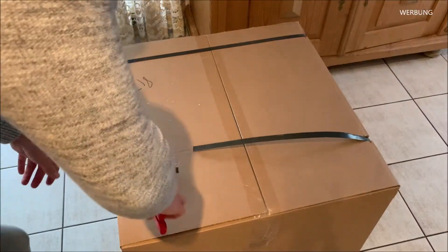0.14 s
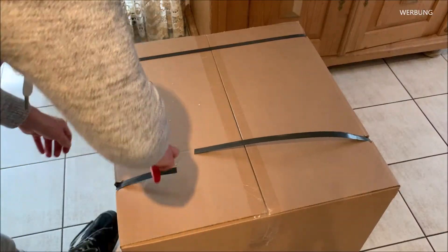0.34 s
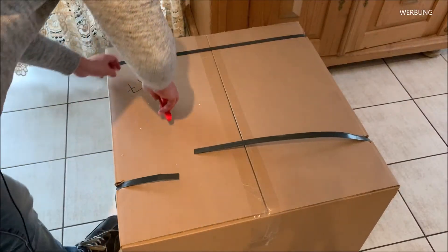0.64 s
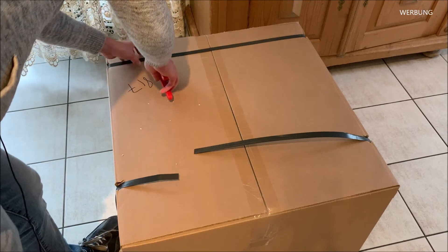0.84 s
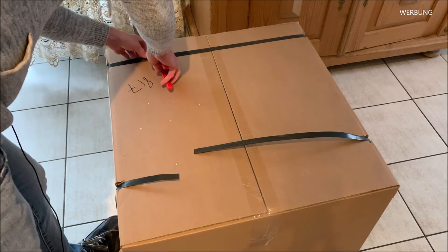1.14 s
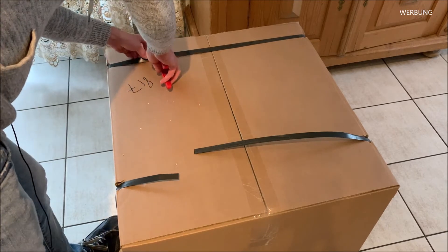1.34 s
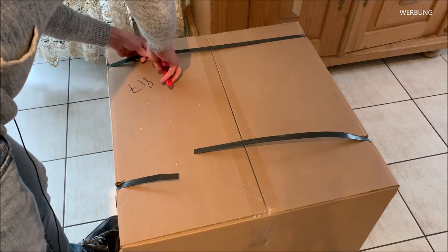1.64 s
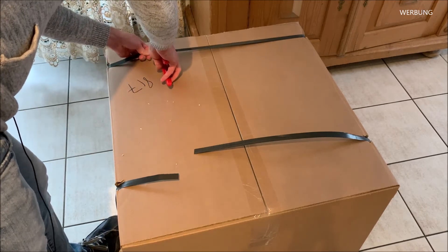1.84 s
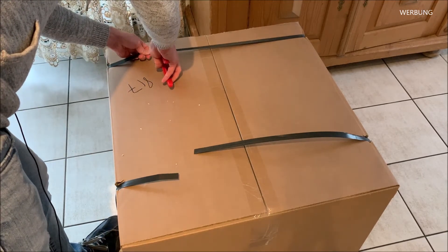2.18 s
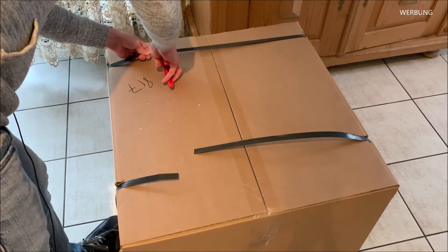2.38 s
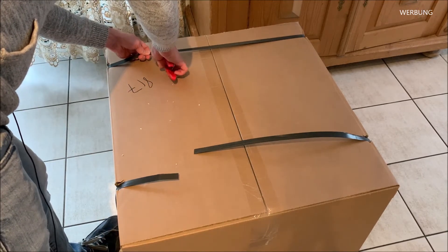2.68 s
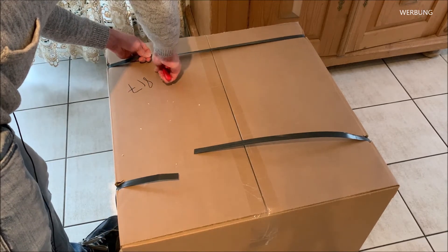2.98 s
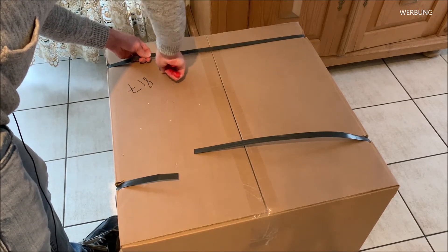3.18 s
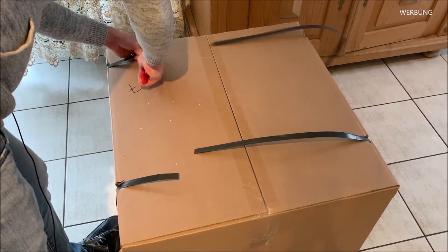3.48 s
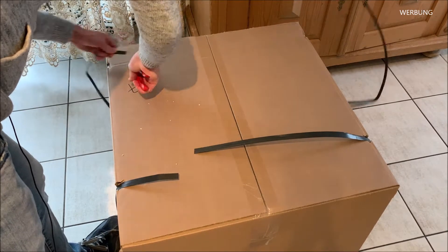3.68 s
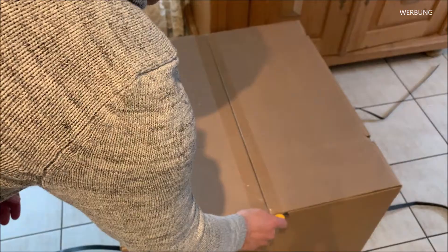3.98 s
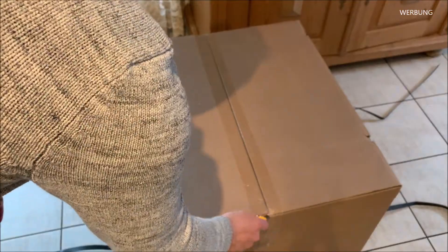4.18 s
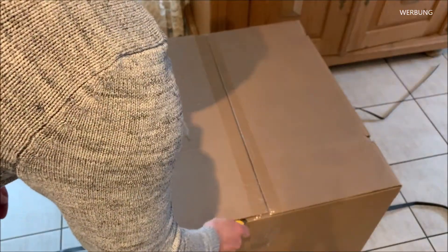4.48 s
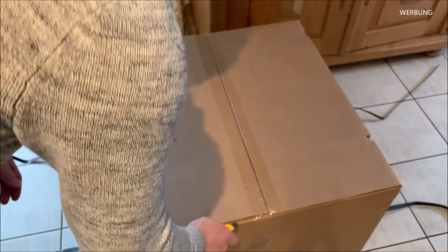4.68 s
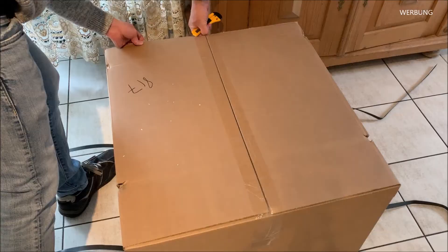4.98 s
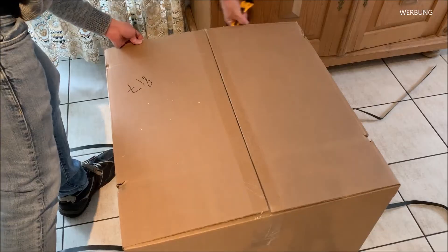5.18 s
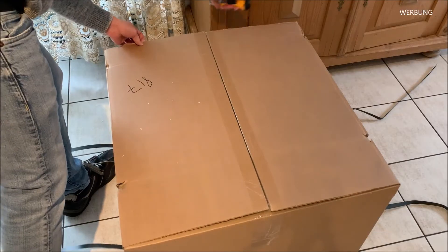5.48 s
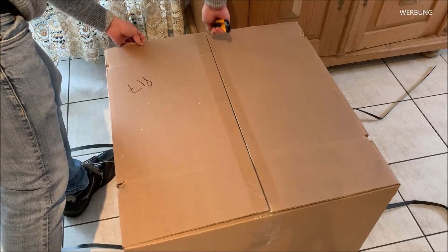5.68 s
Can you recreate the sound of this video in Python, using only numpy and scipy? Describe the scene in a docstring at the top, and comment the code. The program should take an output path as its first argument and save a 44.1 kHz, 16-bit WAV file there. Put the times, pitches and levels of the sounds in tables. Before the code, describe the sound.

Close up in a tiled room, hands bump and rustle over a large hollow cardboard box, with low air buffeting the microphone. The strap ticks and creaks faintly, then snaps with a very loud crack and boxy thump, and its loose end slaps down and rings briefly. After an abrupt cut, a knife slits tape in raspy pulls that drum the lid.

```python
"""In a tiled room, stirred air buffets the microphone while hands fumble on a big cardboard box.
Snips bite through its taut plastic strap: crunching noise bursts, with knocks of the box's ringing modes.
The strap ticks and creaks in stick-slip jerks, snaps at 3.5 s, and its loose end whips down and rings.
After a jump in time a knife squeaks and slits the tape along the lid in two strokes of several pulls;
torn tape is coloured random clicks, and coarser clicks drum the hollow box under it."""
import sys
import numpy as np
from scipy import signal
from scipy.io import wavfile
from scipy.ndimage import uniform_filter1d

SR = 44100
rng = np.random.default_rng(int(sys.argv[2]) if len(sys.argv) > 2 else 0)


def to_wav(s):
    """Save 16-bit WAV."""
    ch = np.atleast_2d(s).T  # columns
    pcm = np.round(np.clip(ch, -1, 1) * 32767)  # PCM
    wavfile.write(sys.argv[1], SR, pcm.astype(np.int16))


N = 257103
TIME = np.arange(N) / SR
JUMP_S = 3.97  # jump in time from strap to knife
# In all tables, levels are those before the trims in the functions; spectra are relative.


def amp(db):
    """Linear gain of a level in dB."""
    return 10 ** (np.asarray(db) / 20)


def evened(x):
    """Scales a steady sound to an RMS of 1."""
    return x / np.sqrt(np.mean(x ** 2) + 1e-20)


def unit(x):
    """Scales a short sound to the energy of 25 ms at full level."""
    return x * np.sqrt(SR / 40 / (np.sum(x ** 2) + 1e-20))


def read(points, hz):
    """Reads a curve of (f, value) points along a logarithmic frequency axis."""
    f, value = np.transpose(points)
    return np.interp(np.log(hz + 1), np.log(f + 1), value)


def level(rows):
    """Rows of (t, dB) as a gain curve, silent outside them."""
    t, db = np.transpose(rows)
    return amp(np.interp(TIME, t, db)) * (TIME >= t[0]) * (TIME <= t[-1])


def add(mix, start_s, sound):
    """Lays a sound into the mix in place, cut off at the end."""
    part = mix[max(round(start_s * SR), 0):][:len(sound)]
    part += sound[:len(part)]


def through(x, response):
    """Passes a sound through an impulse response, keeping its length."""
    return signal.oaconvolve(x, response)[:len(x)]


def colour(points, size=4096):
    """Causal (minimum-phase) impulse response with the given spectrum."""
    hz = abs(np.fft.fftfreq(size, 1 / SR))
    log_gain = np.log(amp(read(points, hz)))
    spectrum = np.exp(np.conj(signal.hilbert(log_gain)))
    return np.fft.ifft(spectrum).real[:size // 2]


def ring(hz, t60, size=22050):
    """A resonance: a sine that falls by 60 dB in t60 seconds."""
    t = TIME[:size]
    return np.sin(2 * np.pi * hz * t) * np.exp(-np.log(1000) * t / t60)


def slips(per_s, spread_db, hiss):
    """Stick and slip: random clicks of uneven size over a smooth hiss."""
    uneven_db = spread_db * np.minimum(rng.exponential(1, N), 4)
    sizes = amp(uneven_db) * rng.choice([-1, 1], N)
    clicks = evened(sizes * (rng.random(N) < per_s / SR))
    return evened(clicks + hiss * rng.standard_normal(N))


def waver(depth_db, per_s):
    """A gain wandering around 1, drawn anew per_s times a second."""
    return amp(depth_db * np.interp(TIME * per_s, np.arange(N), rng.standard_normal(N)))


def arches(rows, roundness, axis=2):
    """Each move speeds up and slows down again; its peak dB is in the given column."""
    out = np.zeros(N)
    for row in rows:
        progress = np.arange(0, row[1], 1 / SR) / row[1]
        add(out, row[0], amp(row[axis]) * abs(np.sin(np.pi * progress)) ** roundness)
    return out


# quiet noise of the room: f/Hz, density/dB per Hz
ROOM_FLOOR = [(20, -2), (50, 12.5), (90, -6.5), (300, -10.5), (700, -19), (2000, -25), (6000, -33.5),
              (16000, -33.5)]
# air on the microphone: f/Hz, density/dB per Hz
GUST = [(8, -4), (18, 6.5), (30, 0), (50, -7.5), (80, -25.5), (140, -35.5), (400, -81)]
# sweeps of the arm that buffet the microphone: start t/s, length t/s, level/dB
ARM_SWEEPS = [(0, 0.82, -31.5), (.46, 0.52, -23.5), (.9, 0.62, -35), (2.95, 0.98, -38), (5.08, 1, -52)]
DRAUGHT_DB, LATE_DRAUGHT_DB = -46, -48  # stirred air before and after the jump in time


def air(floor_db=-63, gust_db=-2, heave_db=22, late_heave_db=8):
    """Quiet room noise; stirred air and arm sweeps add low flutter and a pressure heave below hearing."""
    floor = evened(through(rng.standard_normal(N), colour(ROOM_FLOOR)))
    flutter = evened(through(rng.standard_normal(N), colour(GUST, size=16384)))
    heave_hz = 5 * waver(depth_db=2, per_s=7)
    heave = np.sin(2 * np.pi * np.cumsum(heave_hz) / SR)
    early = TIME < JUMP_S
    stirred = amp(np.where(early, DRAUGHT_DB, LATE_DRAUGHT_DB))
    draught = uniform_filter1d(np.hypot(arches(ARM_SWEEPS, roundness=0.37), stirred), size=1500)
    height = np.minimum(amp(np.where(early, heave_db, late_heave_db)) * draught, .7)
    height = uniform_filter1d(height, size=4000)
    return amp(floor_db) * floor + amp(gust_db) * draught * flutter + height * heave


# fingers bumping the box: f/Hz, density/dB per Hz
BUMP = [(50, -8), (130, -0.5), (200, -3.5), (300, -1.5), (430, -6), (600, -11), (800, -27.5), (1050, -16),
        (1500, -38), (3000, -40)]
# rustle of rubbed board: f/Hz, density/dB per Hz
RUB = [(300, -4.5), (700, 5), (1050, 5.5), (1400, 1.5), (2100, 3), (3200, -1.5), (4300, 0), (5800, -5),
       (7500, -3), (10000, -17), (16000, -24)]
# strap sliding over board: f/Hz, density/dB per Hz
SLIDE = [(1000, -27.5), (2500, -14), (4400, 1.5), (5600, -1), (7500, 7), (9200, 1), (11500, -8.5),
         (16000, -27)]
# a hand shifts its grip on the lid: start t/s, length t/s, box rumble level/dB, rustle level/dB
GRIP_SHIFTS = [(0, 0.021, -27, -34), (.05, 0.14, -51, -48.5), (.21, 0.047, -40, -41),
               (.5, 0.29, -53.5, -56.5), (.875, 0.16, -35.5, -43.5), (1.135, 0.069, -41, -56),
               (1.28, 0.18, -45, -54), (1.52, 0.24, -43.5, -52.5), (1.862, 0.035, -44, -81),
               (1.96, 0.054, -47, -62), (2.335, 0.037, -39.5, -46), (2.38, 0.13, -53.5, -69),
               (2.49, 0.17, -46.5, -57), (2.78, 0.079, -41, -53.5), (3.235, 0.029, -42.5, -55.5),
               (3.29, 0.062, -51, -60), (3.41, 0.1, -43, -55.5), (3.77, .07, -35.5, -56.5)]
# the smooth strap slides over the board: start t/s, length t/s, hiss level/dB
STRAP_SLIDES = [(.06, 0.065, -49), (.163, 0.067, -42.5), (.94, 0.051, -51), (1.06, 0.073, -51.5),
                (1.28, 0.046, -52.5), (1.37, .08, -51), (1.56, 0.15, -55), (2.52, 0.068, -61),
                (3.53, 0.24, -51.5), (3.755, 0.077, -36.5), (3.922, 0.053, -42)]
HELD_RUMBLE_DB, HELD_RUSTLE_DB = -57.5, -70  # hands never quite still while they hold the snips


def handling(rumble_db=-3, rustle_db=-2, slide_db=-1):
    """Fingers and strap drag over the board: sparse bumps in the box, a fine rustle and a smooth hiss."""
    grip = waver(depth_db=3, per_s=45)
    bumps = slips(per_s=60, spread_db=1.0, hiss=0.63)
    rumble = evened(through(bumps * grip, colour(BUMP)))
    fibres = slips(per_s=450, spread_db=4, hiss=.9)
    rustle = evened(through(fibres * grip, colour(RUB)))
    smooth_slips = slips(per_s=2700, spread_db=-2.5, hiss=1.0)
    slide = evened(through(smooth_slips, colour(SLIDE)))
    holding = TIME < JUMP_S
    press = np.hypot(arches(GRIP_SHIFTS, roundness=0.45), amp(HELD_RUMBLE_DB) * holding)
    drag = np.hypot(arches(GRIP_SHIFTS, roundness=0.65, axis=3), amp(HELD_RUSTLE_DB) * holding)
    sliding = arches(STRAP_SLIDES, roundness=1.7)
    return amp(rumble_db) * press * rumble + amp(rustle_db) * drag * rustle + amp(slide_db) * sliding * slide


# decay of the tiled room: f/Hz, t60/s
ROOM_T60 = [(100, 0.45), (400, 0.38), (1500, 0.51), (4000, 0.4), (8000, 0.3), (16000, 0.45)]


def room(x, build_s=0.0051):
    """Diffuse tail of the tiled room: noise that builds up, each band dying at its own speed."""
    hz, t, z = signal.stft(rng.standard_normal(SR), SR, nperseg=256)
    decay = np.exp(-np.log(1000) * t / read(ROOM_T60, hz)[:, None])
    tail = signal.istft(z * decay, SR, nperseg=256)[1][:SR]
    tail = tail * (1 - np.exp(-(TIME[:SR] / build_s) ** 2))
    return through(x, tail / np.linalg.norm(tail))


# reflections from lid, body and floor: delay t/s, linear gain
NEAR_ECHOES = [(.0036, 0.097), (.0049, 0.05), (.0063, .14), (0.011, 0.071)]


def near_echoes(x):
    """First reflections from the surfaces around the hands."""
    out = x.copy()
    for delay_s, gain in NEAR_ECHOES:
        add(out, delay_s, gain * x)
    return out


# modes of the hollow box, damped further while the panel is struck: f/Hz, level/dB, t60/s
BOX_MODES = [(121.5, 7, 0.71), (179, 4, 0.47), (219.6, 7.5, 0.71), (249, 9.5, 0.9), (299, 11.5, 0.057),
             (357, 5, 0.2), (438, -3.5, 0.74), (513, -9.5, 0.34), (550, -23.5, 1), (690, -14, 0.36),
             (816, -23, 0.069), (925, -6.5, 0.24), (986, -19.5, 0.22), (1390, -22, .45), (1670, -29.5, .25),
             (1810, -24, 0.6), (2400, -13.5, 0.27), (3400, -39.5, 0.37)]


def box_knock(damp_s=0.0083, ring_db=-24, give_s=0.00015, crush_db=-7, crush_s=.007):
    """The panel gives, heavily damped, with a dull crush of its flutes; the hollow box rings on weakly."""
    t = TIME[:SR // 2]
    modes = sum((-1) ** k * amp(db) * ring(hz, t60) for k, (hz, db, t60) in enumerate(BOX_MODES))
    damping = np.exp(-t / damp_s) + amp(ring_db)
    panel = unit(modes * damping * (1 - np.exp(-t / give_s)))
    crush = unit(through(rng.standard_normal(len(t)) * np.exp(-t / crush_s), colour(BUMP)))
    return unit(panel + amp(crush_db) * crush)


# clack of the board: f/Hz, density/dB per Hz
CLACK = [(150, -9.5), (450, 11.5), (800, 3.5), (1250, -4), (1600, -2.5), (2150, -5.5), (2700, -6.5),
         (4000, -18), (9000, -48)]
# crack of the plastic: f/Hz, density/dB per Hz
CRACK = [(800, -14.5), (2400, -11), (3400, 7), (4600, 7), (5500, 6.5), (6500, 2.5), (8100, 4.5),
         (10000, -2), (13000, -9), (16000, -19.5)]
# blows of strap, snips and knife on the box:
# t/s, box knock level/dB, board clack level/dB, plastic crack level/dB, crunch decay to 1/e t/ms
BLOWS = [(0.1661, -32, -40, -43, 3.5), (0.1774, -63, -33.5, -43, 3.1), (0.1931, -37.5, -28.5, -29, 2.4),
         (0.3866, -65, -54, -84, 6.6), (0.8151, -26, -50, -60.5, 1.7), (0.88, -32, -54, -52, 6.9),
         (0.8905, -32, -38.5, -48.5, 6.2), (0.9324, -69, -49, -45, 4), (0.936, -26, -40, -50.5, 11),
         (0.9802, -63, -40, -43, 4.3), (1, -49, -39.5, -47.5, 3), (1.072, -72, -39, -37.5, 2.2),
         (1.1428, -44, -50, -70, 3.7), (1.17, -42, -67, -81, 2), (1.589, -47, -73, -59, 2),
         (1.7202, -38.5, -82, -78, 1), (1.7544, -37.5, -44, -45.5, 6), (1.8659, -41.5, -65, -86, 3),
         (2.1068, -45.5, -88, -94, 1.6), (2.3421, -46.5, -48.5, -51, 11), (2.5925, -46, -45.5, -57, 1.6),
         (2.782, -32.5, -53, -77, 9), (2.8601, -35.5, -43, -46.5, 6.6), (3.2423, -41.5, -49, -59.5, 3),
         (3.2518, -38.5, -49, -58, 4), (3.418, -40.5, -53, -59, 0.83), (3.4976, -20.5, -27, -24.5, 3.2),
         (3.5003, -12, -15.5, -21, 0.72), (3.5027, -6, -10, -23.5, 2.3), (3.512, -18.5, -19.5, -30, 29),
         (3.53, -16.5, -22.5, -34.5, 60), (3.7265, -41.5, -52, -37, 2.6), (3.7291, -46, -36, -37.5, 9),
         (3.7502, -33, -36, -26, 3.9), (3.753, -29, -15, -24.5, 0.9), (3.756, -42.5, -28, -21, 1.7),
         (3.967, -57, -49.5, -64, 0.91), (4.0615, -80, -75, -66.5, 0.59), (4.1406, -41, -73, -53.5, 0.84),
         (4.2654, -30, -35.5, -33.5, 9), (4.5966, -59, -62, -59, 1.9), (4.8938, -58, -58.5, -59.5, 2),
         (5.1442, -23.5, -28.5, -52, 1.4), (5.436, -49, -59, -57, 2.8), (5.5669, -73, -60, -77, 3.7)]


def blows(knock_db=-2, clack_db=-1, crack_db=0,
          knock_room_db=-7, clack_room_db=-7, crack_room_db=-11, bite_db=-10, size=4096):
    """Each blow is a bite and a short crunch in board and plastic that also knocks the box.
    The room gathers sound from all sides, so it is fed the materials' smooth spectra."""
    direct, feed, t = np.zeros(N), np.zeros(N), TIME[:size]
    clack, crack = colour(CLACK), colour(CRACK)
    bite = unit(1.0 * (t == 0))  # a single-sample click
    for s, low_db, mid_db, high_db, ms in BLOWS:
        box = amp(low_db + knock_db) * box_knock()
        add(direct, s, box)
        add(feed, s, amp(knock_room_db) * box)
        board = clack, mid_db + clack_db, clack_room_db
        plastic = crack, high_db + crack_db, crack_room_db
        for material, db, send_db in (board, plastic):
            crunch = unit(rng.standard_normal(size) * np.exp(-t * 1000 / max(ms, .1)))
            contact = crunch + amp(bite_db) * bite
            add(direct, s, amp(db) * unit(through(contact, material)))
            add(feed, s, amp(db + send_db) * unit(material))
    return near_echoes(direct), feed


# brief dips of the level: start t/s, length t/s
DIPS = [(0.75, 0.033), (0.83, 0.052)]
DIP_DB = -39


def dips():
    """The level dips briefly, with soft edges."""
    inside = sum((TIME > s) & (TIME < s + length) for s, length in DIPS)
    return amp(DIP_DB * uniform_filter1d(inside.astype(float), size=256))


# a thin dry tick: f/Hz, density/dB per Hz
TICK_COLOUR = [(1200, -35), (2500, -7.5), (4800, -5.5), (6100, 6.5), (7500, 4), (9300, -3.5), (11300, 1),
               (13000, -6), (16000, 0.5)]
# ticks as the strap strains: t/s, level/dB
STRAIN_TICKS = [(1.9346, -67), (2.0728, -68.5), (2.252, -63), (2.6164, -62), (2.701, -69), (2.98, -59),
                (3.0355, -48), (3.051, -55), (3.07, -55.5), (3.0992, -52.5), (3.131, -53.5), (3.147, -54),
                (3.153, -53.5), (3.159, -57), (3.182, -61.5)]


def ticks(decay_s=0.00096, size=2048):
    """Straining plastic lets go in tiny dry clicks with almost no weight: short coloured noise bursts."""
    out, tick = np.zeros(N), colour(TICK_COLOUR)
    for s, db in STRAIN_TICKS:
        burst = rng.standard_normal(size) * np.exp(-TIME[:size] / decay_s)
        add(out, s, amp(db) * unit(through(burst, tick)))
    return out


# resonances of the snips and the taut strap: f/Hz, level/dB, t60/s
JAW_MODES = [(308, 11.5, 0.041), (1070, 3.5, 0.032), (1470, -11.5, .003), (2210, 2, 0.01),
             (4130, -5, 0.0066), (5400, -24, .005), (7550, 2.5, .007), (8220, -7, 0.024)]
# jaws creaking through the plastic: t/s, level/dB
CREAK_LEVEL = [(2.778, -66), (2.786, -42), (2.812, -47), (2.828, -38.5), (2.852, -42), (2.866, -27),
               (2.876, -40.5), (2.90, -77.5)]


def creak():
    """Quick slips of the jaws ring the snips and the taut strap."""
    jaws = sum(amp(db) * ring(hz, t60) for hz, db, t60 in JAW_MODES)
    jerks = slips(per_s=350, spread_db=2.5, hiss=.25)
    return level(CREAK_LEVEL) * evened(through(jerks, jaws))


# brief rings of the free strap and the blade: t/s, f/Hz, level/dB, t60/s
FREE_RINGS = [(3.7305, 2580, -24, 0.061), (4.3095, 3650, -24.5, .02), (4.323, 3540, -27, 0.025),
              (4.5971, 3540, -26.5, 0.007), (5.437, 3080, -23, 0.0034)]


def rings():
    """Strap and blade flick free and ring for a moment, each a single decaying sine."""
    out = np.zeros(N)
    for s, hz, db, t60 in FREE_RINGS:
        add(out, s, amp(db) * ring(hz, t60))
    return out


CUT_ATTACK_S, CUT_RELEASE_S = 0.0023, .018


def pull(length, sag_db_per_s):
    """The blade bites at once, changes force steadily as it travels (a positive sag loses), and lets go."""
    t = TIME[:SR // 2]
    release = np.exp(-np.maximum(t - length, 0) / CUT_RELEASE_S)
    return np.minimum(t / CUT_ATTACK_S, 1) * amp(-sag_db_per_s * t) * release


# the blade squeaks faintly on the tape: start t/s, length t/s, level/dB, f/Hz, blur width f/Hz
SQUEAKS = [(3.966, 0.11, -61, 2120, 160), (4.597, 0.1, -55.5, 2310, 512), (4.891, 0.087, -62, 3690, 715),
           (5.437, .08, -53, 3480, 382), (5.581, 0.041, -51.5, 2500, 704), (5.684, 0.011, -58, 2550, 291.4)]


def squeak(sag_db_per_s=80):
    """A blurred whistle of steel gliding on plastic, fading as the blade travels."""
    out = np.zeros(N)
    for s, length, db, hz, width_hz in SQUEAKS:
        force = pull(length, sag_db_per_s)
        size = len(force)
        t = TIME[:size]
        noise = rng.standard_normal(size) + 1j * rng.standard_normal(size)
        fuzz = np.interp(2 * width_hz * t, np.arange(size), noise)  # slow noise blurs the tone
        whistle = evened((fuzz * np.exp(2j * np.pi * hz * t)).real)
        add(out, s, amp(db) * force * whistle)
    return out


# tearing tape: f/Hz, density/dB per Hz
SLIT = [(200, 7.5), (600, 3), (900, 3), (1300, -0.5), (2400, 3), (3000, 0), (3500, 2), (4600, -1),
        (6500, -2.5), (9000, -11), (12000, -16.5), (16000, -24)]
# drumming lid: f/Hz, density/dB per Hz
DRUM = [(25, 2), (45, 14.5), (70, 5.5), (120, 2), (210, -5), (330, -0.5), (480, -16), (600, -10.5),
        (800, -23.5), (1300, -23), (3000, -58)]
# pulls of the knife: start t/s, length t/s, box drumming level/dB, tearing level/dB, sag/dB per s
KNIFE_PULLS = [(4.135, 0.17, -45, -46.5, -23), (4.262, 0.14, -32, -34, 25),
               (4.575, 0.068, -52.5, -57, 62.5), (5.001, 0.042, -34.5, -43, 20),
               (5.101, 0.042, -32, -30.5, 13), (5.152, 0.086, -19, -34, 130), (5.27, 0.1, -24, -38, 99),
               (5.398, 0.16, -47.5, -50.5, 77), (5.558, 0.068, -59.5, -51.5, 60)]
GLIDE_DRUM_DB, GLIDE_TEAR_DB = -65.5, -65.5  # the knife hand moving between pulls


def knife(drum_db=0, tear_db=-3.0):
    """The blade tears the tape in tiny jerks; the coarser ones drum the lid."""
    grip = waver(depth_db=3.5, per_s=130)
    jerks = slips(per_s=1600, spread_db=4.5, hiss=.55)
    tear = evened(through(jerks * grip, colour(SLIT)))
    coarse_jerks = slips(per_s=540, spread_db=1.5, hiss=0.27)
    drum = evened(through(coarse_jerks * grip, colour(DRUM)))
    after = TIME > JUMP_S
    drumming, tearing = amp(GLIDE_DRUM_DB) * after, amp(GLIDE_TEAR_DB) * after
    for s, length, low_db, high_db, sag in KNIFE_PULLS:
        force = pull(length, sag)
        add(drumming, s, amp(low_db) * force)
        add(tearing, s, amp(high_db) * force)
    return amp(drum_db) * drumming * drum + amp(tear_db) * tearing * tear


def scene(hands_room_db=-5, snips_room_db=-8, ticks_room_db=-16, knife_room_db=-1):
    """Sources sound directly, and all but squeak and air also feed the room; the dips spare the air."""
    direct, blow_send = blows()
    hands, snips, strain, blade = handling(), creak() + rings(), ticks(), knife()
    snips_send = amp(snips_room_db) * snips + amp(ticks_room_db) * strain
    sends = blow_send, amp(hands_room_db) * hands, snips_send, amp(knife_room_db) * blade
    before = TIME < JUMP_S  # the ring of the room stops dead at the jump in time
    wet = sum(room(send * before) * before + room(send * ~before) for send in sends)
    sound = direct + hands + snips + strain + blade + squeak() + wet
    return (sound * dips() + air())[None]


EDGE_HZ = 16100  # upper band limit


def record(dry, ceiling=1.0):
    """The snap overloads the microphone, which rounds peaks near its ceiling; then the band limit."""
    clipped = dry / (1 + (dry / ceiling) ** 8) ** (1 / 8)
    lowpass = signal.firwin(255, EDGE_HZ, window=("kaiser", 8), fs=SR)
    return signal.oaconvolve(clipped, lowpass[None], "same")


dry = scene()
out = record(dry)
to_wav(out)
```